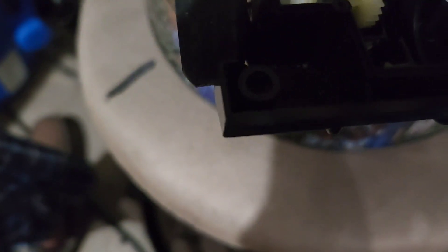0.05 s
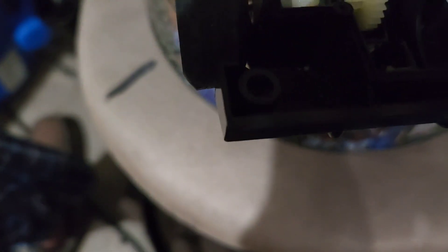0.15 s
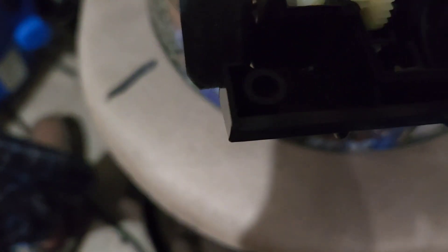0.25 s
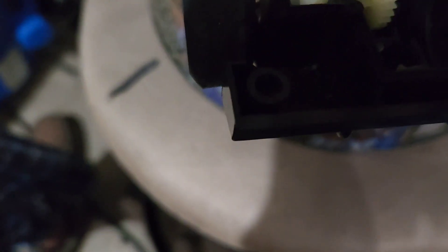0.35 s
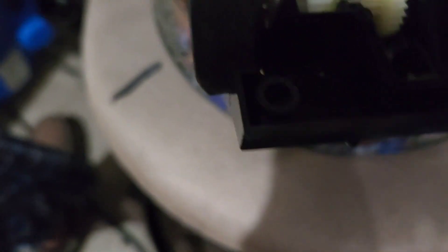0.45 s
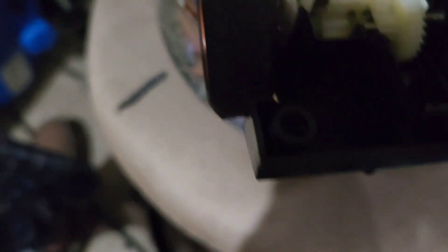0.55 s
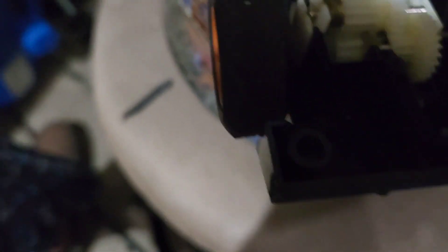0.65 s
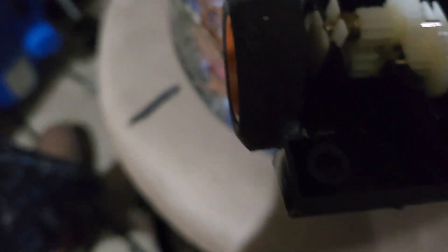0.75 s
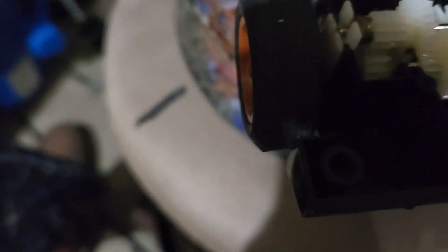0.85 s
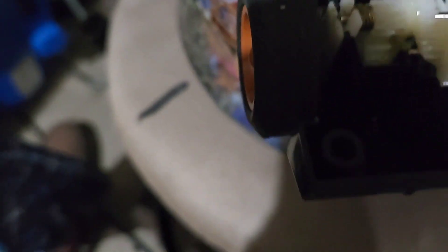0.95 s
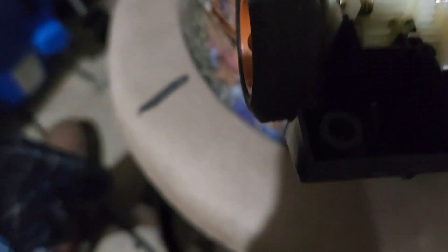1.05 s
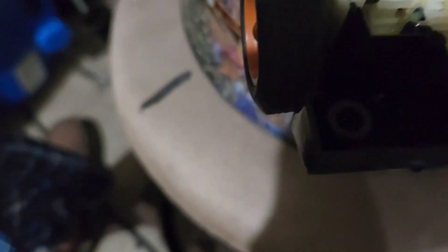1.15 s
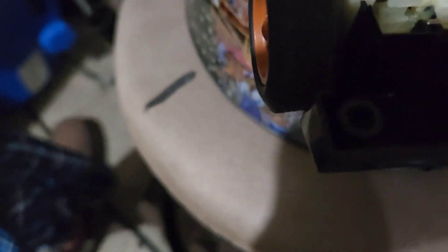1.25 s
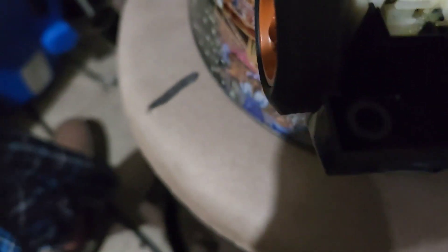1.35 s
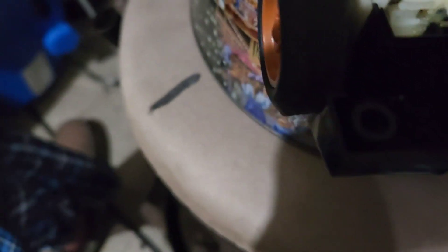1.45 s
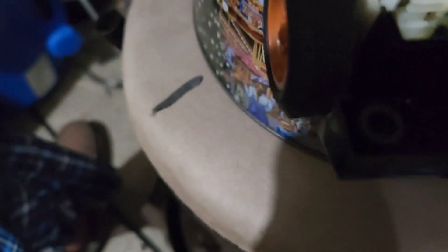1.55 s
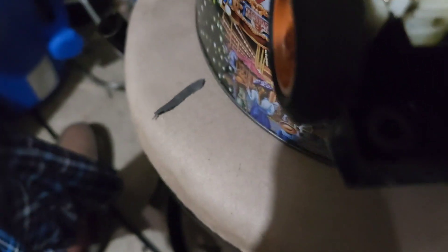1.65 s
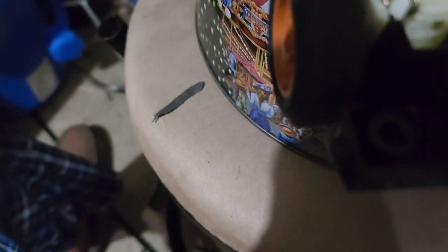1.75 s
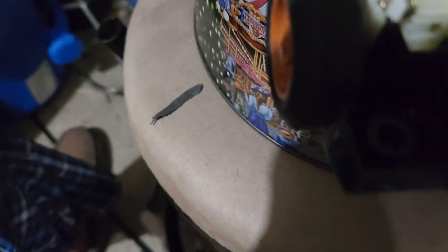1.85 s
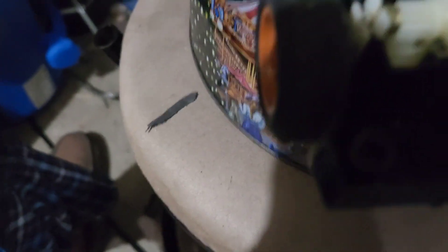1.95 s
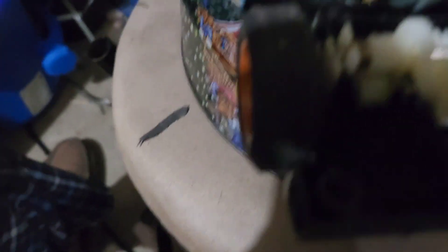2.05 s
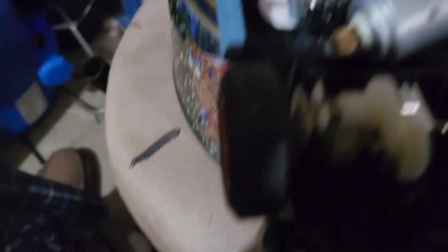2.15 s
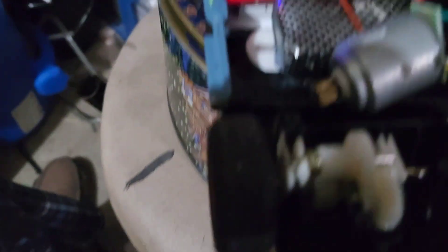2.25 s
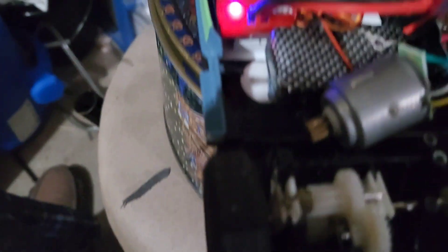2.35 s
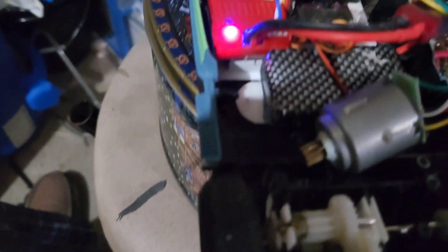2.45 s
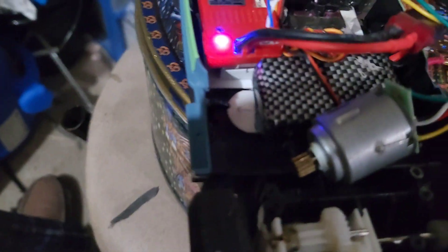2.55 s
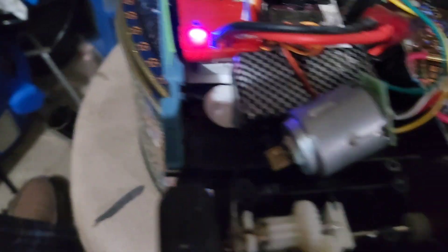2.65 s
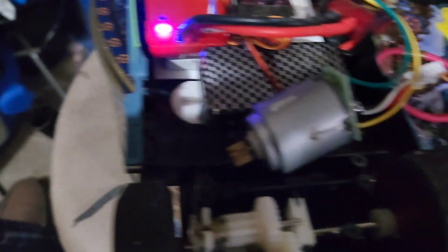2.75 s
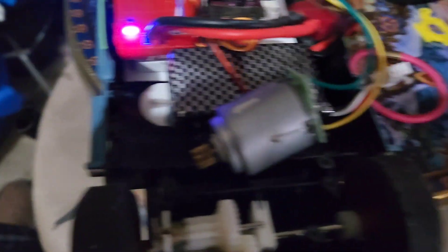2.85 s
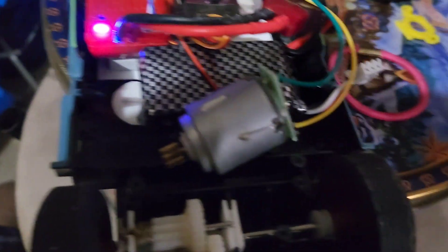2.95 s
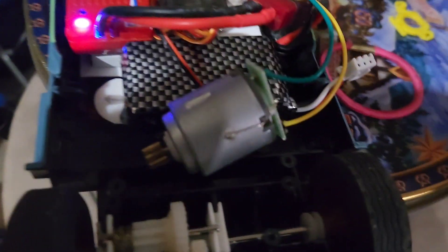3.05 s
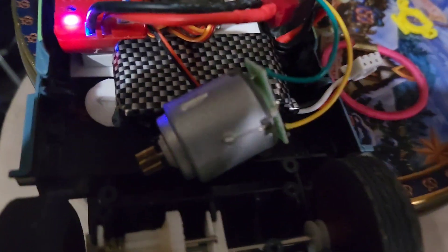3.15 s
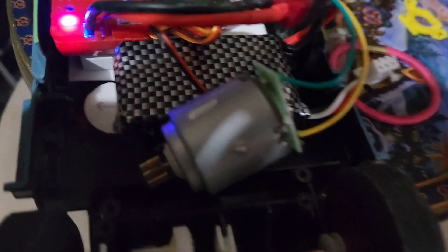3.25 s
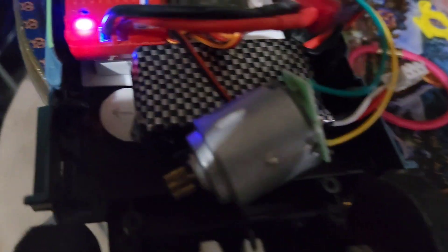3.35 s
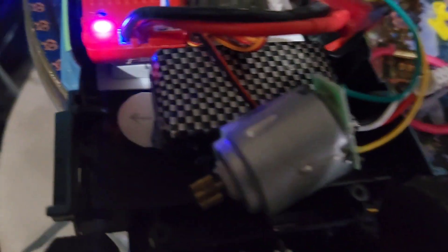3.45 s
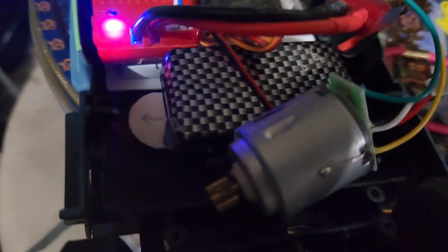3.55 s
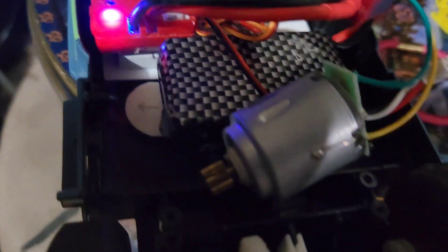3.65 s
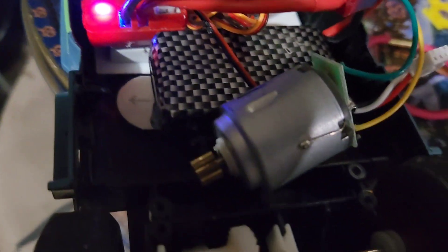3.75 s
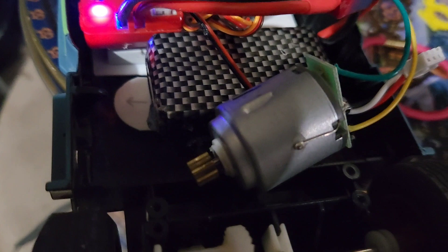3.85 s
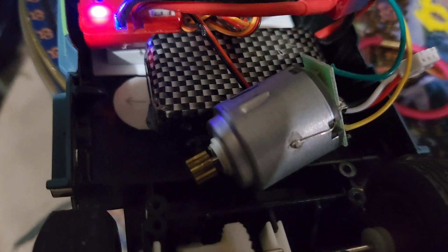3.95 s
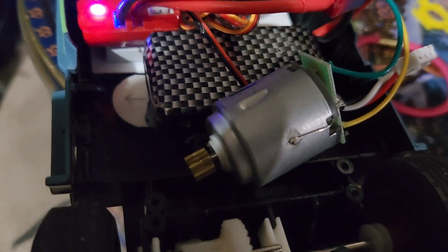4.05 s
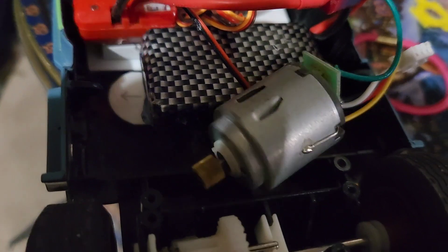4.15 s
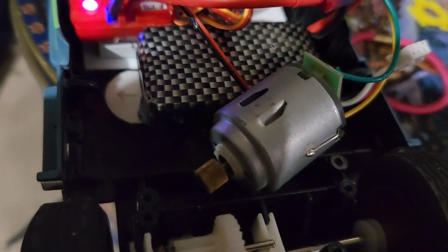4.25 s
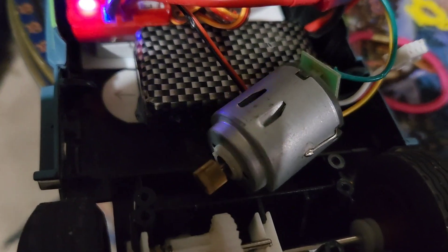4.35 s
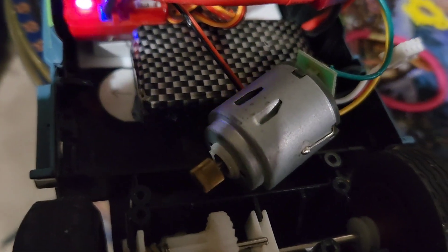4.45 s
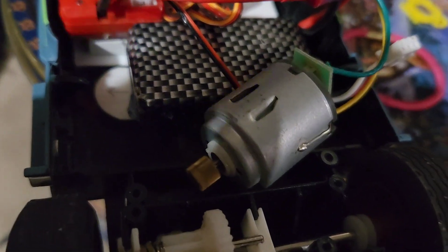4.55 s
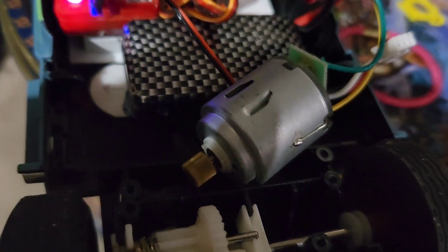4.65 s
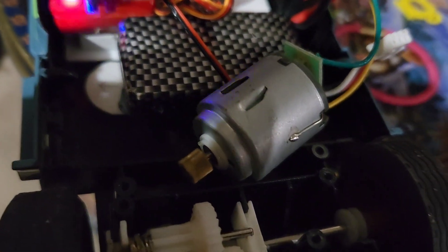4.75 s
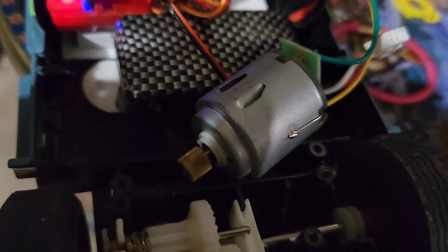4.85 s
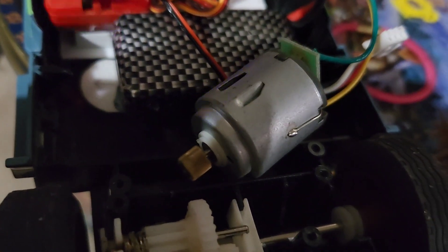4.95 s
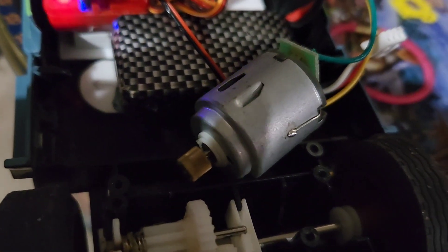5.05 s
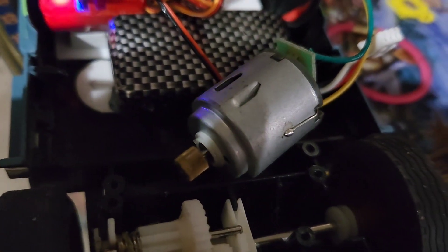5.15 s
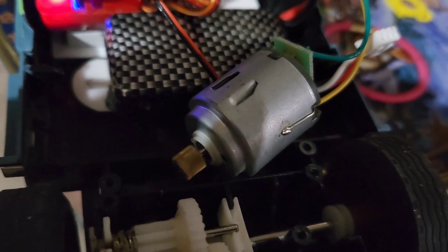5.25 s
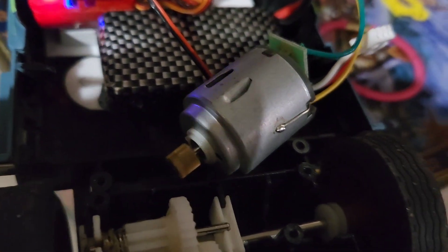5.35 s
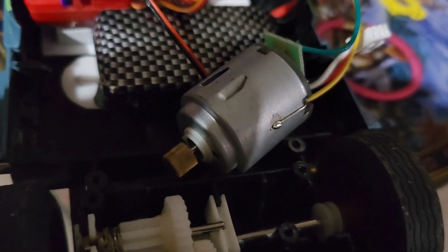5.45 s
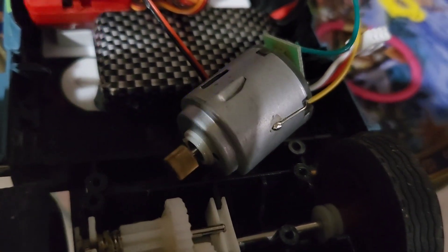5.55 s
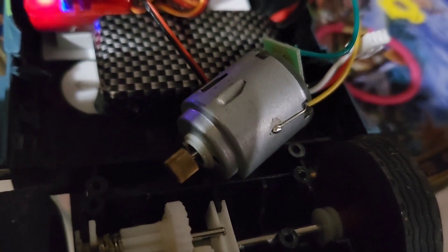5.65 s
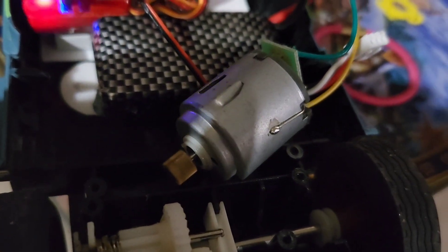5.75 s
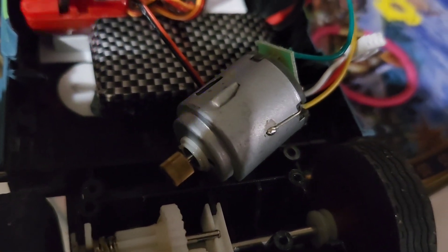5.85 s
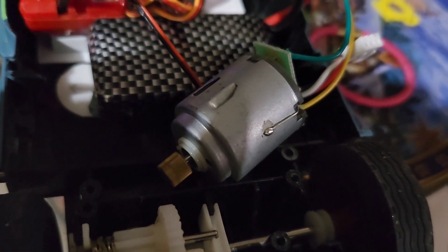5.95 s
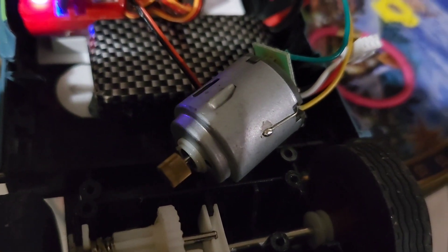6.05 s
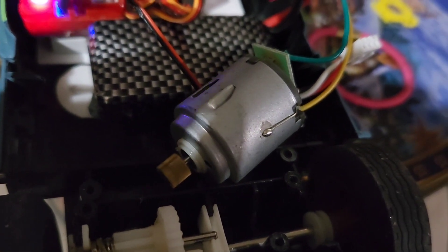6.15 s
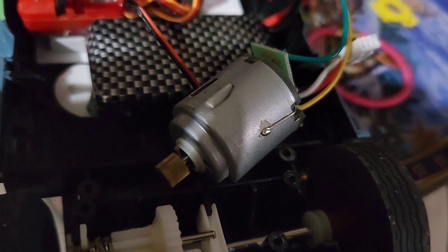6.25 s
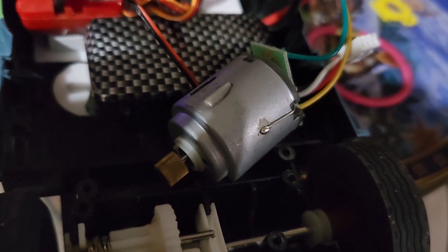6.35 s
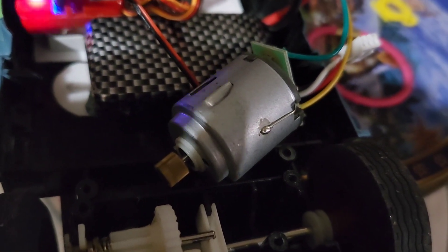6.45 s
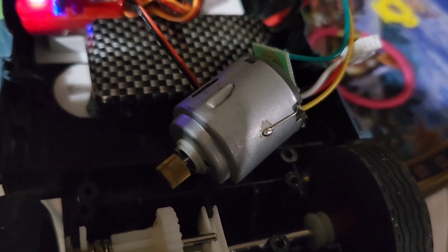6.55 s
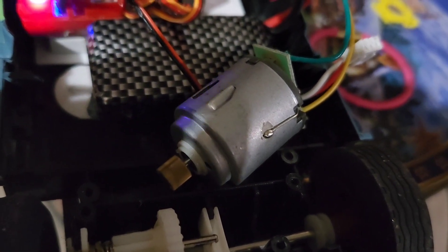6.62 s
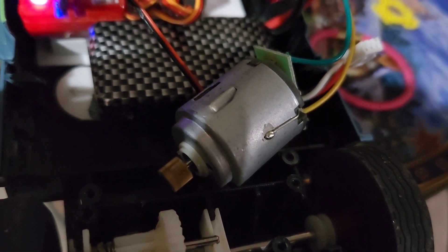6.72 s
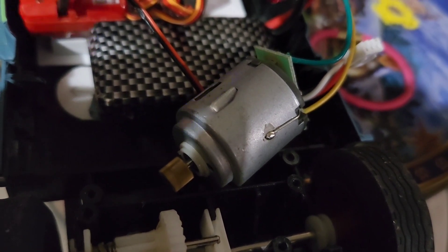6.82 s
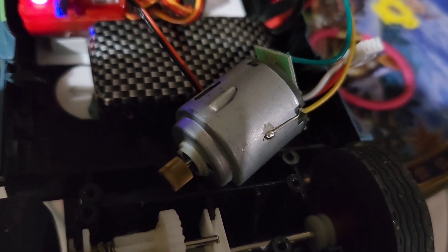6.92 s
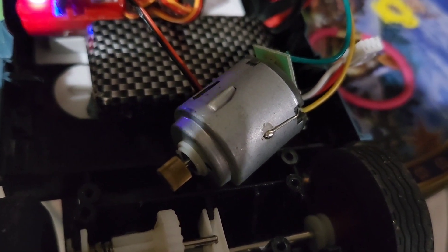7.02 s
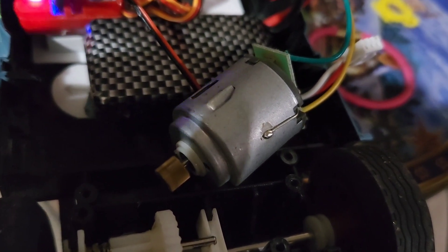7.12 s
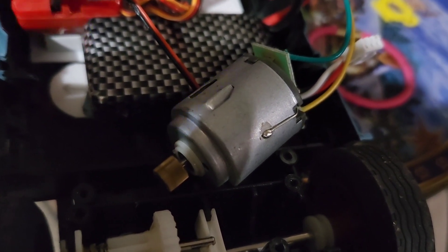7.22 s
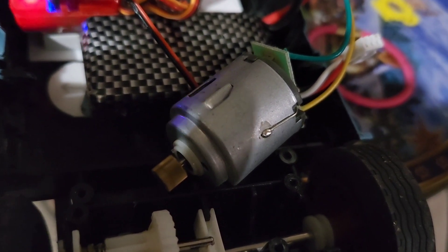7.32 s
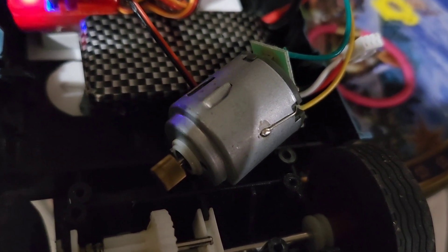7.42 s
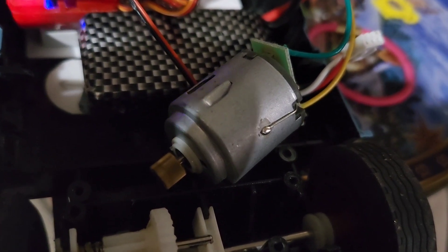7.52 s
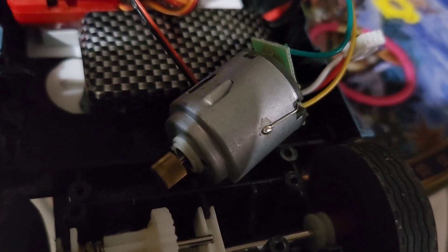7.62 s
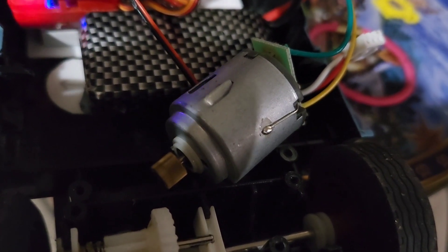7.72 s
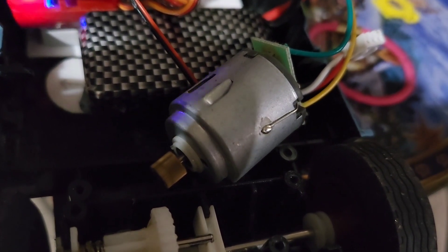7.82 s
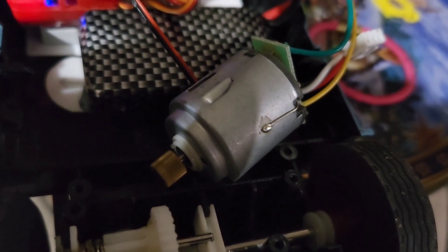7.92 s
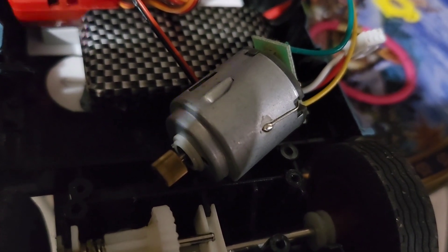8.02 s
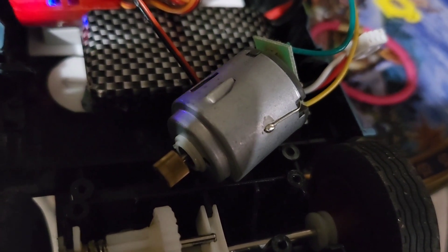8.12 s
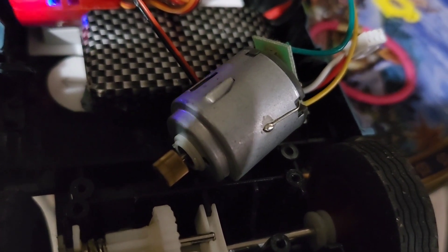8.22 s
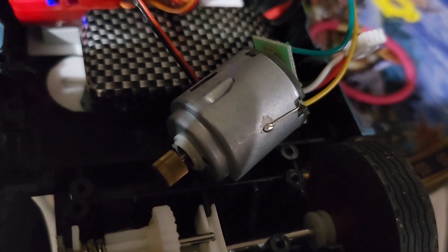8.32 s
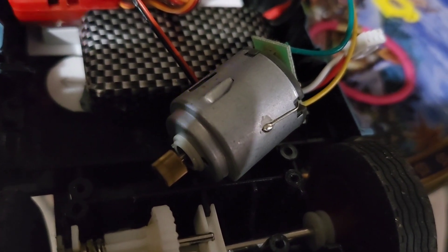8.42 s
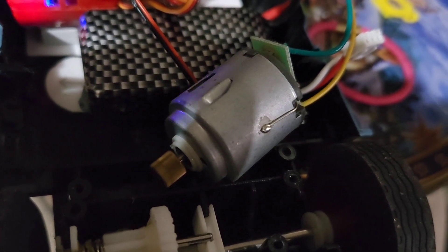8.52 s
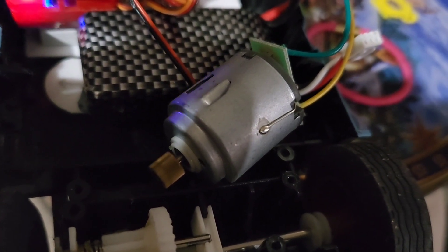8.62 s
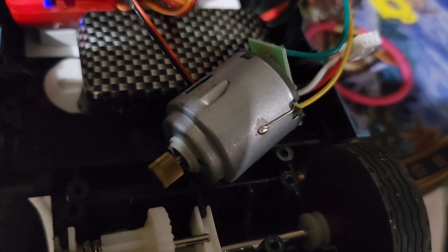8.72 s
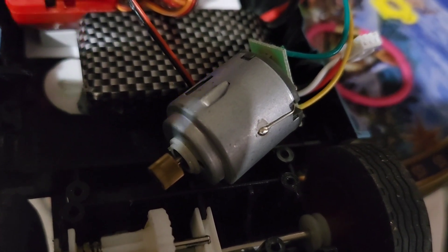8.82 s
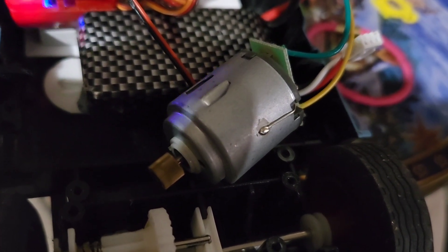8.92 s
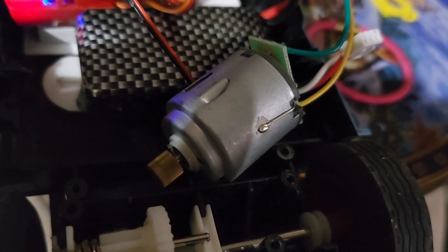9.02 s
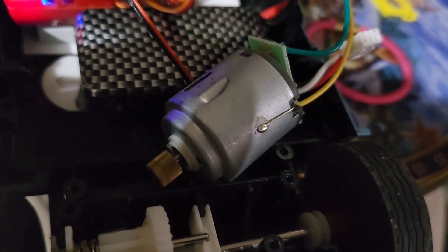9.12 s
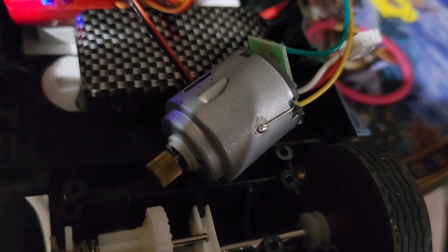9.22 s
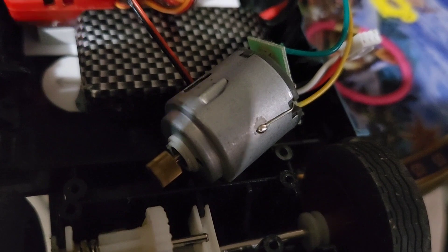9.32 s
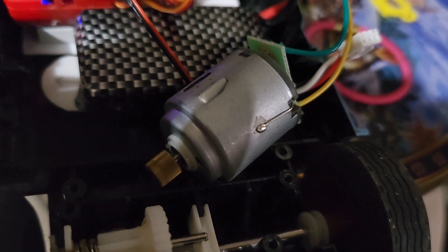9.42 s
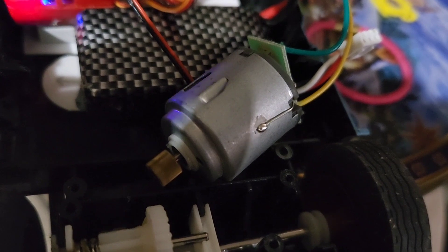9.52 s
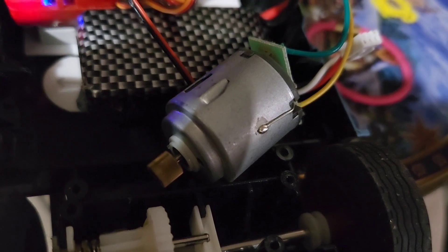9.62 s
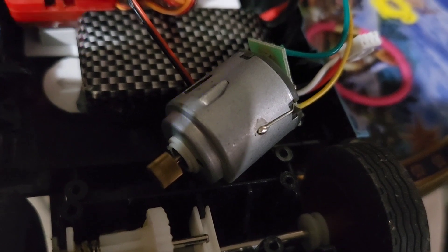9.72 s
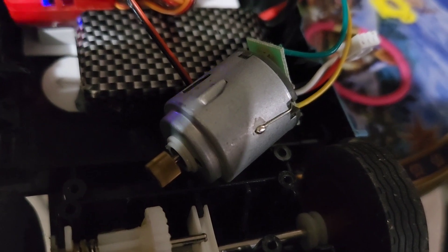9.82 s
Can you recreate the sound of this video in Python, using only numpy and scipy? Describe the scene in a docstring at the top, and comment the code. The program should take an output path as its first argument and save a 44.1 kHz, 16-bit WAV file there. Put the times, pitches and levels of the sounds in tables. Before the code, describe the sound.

In a quiet room with a low hum, hands turn a plastic toy car close to the microphone, making rustles, sharp clicks and a few soft knocks. A distant bird chirps faintly. About four seconds in, a tiny buzz starts a small electric motor lying loose on the chassis. It chatters as its pitch climbs, then settles into a steady, raspy whine, close and to the left.

```python
"""Toy motor spinning up

In a quiet room with a hum and a far bird, hands shift a plastic toy: rustle, clicks, soft knocks.
A speed controller buzzes, then a small brushed motor lying loose on the chassis starts, close on the left.
Its brush scrape and shaft tones ring the can and chassis; it chatters as it climbs, then whines steadily."""
import sys
import numpy as np
from scipy import signal
from scipy.fft import rfft, irfft, next_fast_len
from scipy.io import wavfile
from scipy.ndimage import uniform_filter1d

SR = 44100
rng = np.random.default_rng(int(sys.argv[2]) if len(sys.argv) > 2 else 0)


def unload_wav(signal):
    """Save mono or channel-first audio to the path in sys.argv[1] as 16-bit WAV at rate SR, clipped to [-1, 1]."""
    wavfile.write(
        sys.argv[1],
        SR,
        np.round(np.clip(np.atleast_2d(signal).T, -1, 1) * 32767).astype(np.int16),
    )


N = 435708
TIME = np.arange(N) / SR
FFT_SIZE = next_fast_len(N, True)
HZ = np.fft.rfftfreq(FFT_SIZE, 1 / SR)


def gain_of(db):
    """Decibels to amplitude."""
    return 10 ** (np.asarray(db) / 20)


def curve(points):
    """Joins spectrum points on a log-frequency axis."""
    f, *columns = np.transpose(points)
    return np.squeeze([np.interp(np.log(HZ + 1), np.log(f + 1), c) for c in columns])


def follow(rows):
    """A soft gate for the span of a (time, value) table, and its value at every sample."""
    times, values = np.transpose(rows)
    gate = uniform_filter1d(1. * ((TIME > times[0]) & (TIME < times[-1])), size=300)
    return gate, np.interp(TIME, times, values)


def humps(modes, hz=HZ):
    """Summed resonance peaks in dB."""
    return sum(db / (1 + (2 * (hz - f) / width) ** 2) for f, width, db in modes)


def band(lo_hz, hi_hz):
    """Smooth band-pass gain."""
    return 1 / np.sqrt((1 + (lo_hz / (HZ + 1)) ** 6) * (1 + (HZ / hi_hz) ** 6))


def coloured(gain, channels=2):
    """Noise of rms 1 with the given spectrum."""
    white = rng.standard_normal((channels, len(HZ), 2)) @ [1, 1j]
    noise = irfft(white * gain, FFT_SIZE)[:, :N]
    return noise / np.sqrt(np.mean(noise ** 2) + 1e-20)


def wobble(lo_hz, hi_hz):
    """Random modulation of rms 1 between two rates."""
    return coloured(band(lo_hz, hi_hz), channels=1)[0]


def panned(db):
    """Left and right gains; positive leans left."""
    return gain_of([[db / 2], [-db / 2]])


def add(mix, start_s, sound):
    """Mixes a sound in at its start time."""
    part = mix[:, round(start_s * SR):][:, :sound.shape[1]]
    part += sound[:, :part.shape[1]]


# room tone EQ: f/Hz, relative level/dB
ROOM_EQ = [(12, -28), (24, -17.5), (38, -2.5), (53, -4), (85, -17.5), (130, -8), (162, -20.5), (196, -28),
           (222, -29), (246, -18), (268, -32.5), (310, -31.5), (344, -43), (4120, -48), (10000, -67.5),
           (10900, -54.5), (15700, -74)]
# stereo image of the room: f/Hz, left-right likeness
ROOM_LIKENESS = [(60, 0.95), (180, 0.76), (550, -0.5), (1650, 0.2), (4970, -1.4), (15000, -0.2)]


def room_tone():
    """Low rumble, nearly mono, under a faint wide hiss."""
    left, other = coloured(gain_of(curve(ROOM_EQ)))
    same = np.clip(curve(ROOM_LIKENESS), 0, 1)
    right = same * rfft(left, FFT_SIZE) + np.sqrt(1 - same ** 2) * rfft(other, FFT_SIZE)
    return gain_of(-55) * panned(2.6) * [left, irfft(right, FFT_SIZE)[:N]]


# hum lines: f/Hz, level/dB
HUM_LINES = [(120, -74.5), (239, -69)]
# fader of the electronic whine: t/s, level/dB
WHINE_FADER = [(0, -96), (.9, -102), (1.2, -84), (2.2, -81.5), (3, -87), (4.3, -83.5)]


def hum(whine_hz=10541):
    """A low hum and a thin electronic whine, wavering together in level."""
    _, whine_db = follow(WHINE_FADER)
    lines = sum(gain_of(db) * np.sin(2 * np.pi * hz * TIME) for hz, db in HUM_LINES)
    whine = gain_of(whine_db) * np.sin(2 * np.pi * whine_hz * TIME)
    return np.sqrt(2) * (lines + whine) * gain_of(2 * wobble(2, 17))


# bird calls: t/s, length/s, from f/Hz, to f/Hz, level/dB
BIRD_CHIRPS = [(2.266, 0.18, 5100, 3950, -66.5), (2.301, 0.18, 3900, 3420, -64.5),
               (2.93, 0.11, 4710, 3360, -66), (3.31, 0.12, 4530, 4820, -67),
               (3.373, 0.079, 3830, 3380, -62), (3.657, 0.097, 4310, 3960, -58),
               (3.727, 0.071, 3900, 3510, -66)]


def bird(reverb_t60=0.2):
    """Raspy whistles, mostly falling, smeared by distance."""
    calls = np.zeros((1, N))
    for start, length, from_hz, to_hz, db in BIRD_CHIRPS:
        t = np.arange(0, length, 1 / SR)
        trill = 1 + 0.036 * np.sin(2 * np.pi * 30 * t)
        hz = np.interp(t, [0, length], [from_hz, to_hz]) * trill
        whistle = np.sin(2 * np.pi * np.cumsum(hz) / SR) * signal.windows.tukey(len(t), .8)
        add(calls, start, gain_of(db) * whistle[None])
    calls *= 0.8 + 1.13 * wobble(18, 280)  # rasp
    tail = rng.standard_normal((2, 15000)) * gain_of(-60 * np.arange(15000) / SR / reverb_t60)
    return 0.49 * calls + signal.oaconvolve(calls, tail / np.linalg.norm(tail[0]), axes=1)[:, :N]


# EQ of skin on plastic: f/Hz, relative level/dB
RUB_EQ = [(600, 5.5), (900, 3), (2230, 0.5), (2900, -1), (3400, -0.5), (4400, -1), (5800, -13.5),
          (7500, -12.5), (10000, -23), (12500, -15.5), (15700, -15.5)]
# resonances of the rubbed plastic: f/Hz, width/Hz, boost/dB
RUB_MODES = [(652, 71, 8.5), (806, 70, 2.5), (1190, 120, 9.5), (2160, 150, 5), (3490, 200, 0),
             (4140, 190, 7.5), (7630, 395, 5), (11800, 700, 2), (15060, 900, 2.5)]
# hollow ring in the rumble: f/Hz, width/Hz, boost/dB
HOLLOW_MODE = [(361, 19, 13.5)]
# finger strokes: start t/s, top t/s, end t/s, scrape/dB, hiss/dB, treble/dB, rumble/dB, pan/dB
FINGER_STROKES = [(-.05, .0, 0.1, -68, -78, -81, -72, 9), (0.11, 0.151, 0.26, -63, -61, -57, -46.5, 6),
                  (0.236, 0.284, 0.3, -69, -60, -76, -59.5, 7.5),
                  (0.267, 0.38, 0.43, -64, -55, -58.5, -46.5, 5.5),
                  (0.36, 0.397, 0.48, -47, -71, -66.5, -45, 6.5),
                  (0.437, 0.513, 0.45, -76.5, -72, -73, -59.5, 6),
                  (0.668, 0.773, 0.95, -84, -77, -75, -86.5, 8.5),
                  (0.935, .95, 1.6, -90, -80.5, -62, -92, 1),
                  (1.154, 1.175, 1.25, -54, -63, -60.5, -65, 13),
                  (1.236, 1.287, 1.45, -63, -51.5, -55, -66, 5.5),
                  (1.31, 1.321, 1.45, -44.5, -58, -69, -43, 5.5),
                  (1.48, 1.598, 1.68, -76.5, -69, -65, -60, 4.5),
                  (1.595, 1.654, 1.78, -76, -52.5, -55.5, -60, 3),
                  (1.666, 1.74, 1.87, -61, -55, -57, -75, 5),
                  (1.729, 1.738, 1.867, -39.5, -62, -74, -40, 7.5),
                  (1.866, 1.917, 1.996, -44, -44.5, -61, -43, 3),
                  (3.008, 3.066, 3.27, -78, -72, -77, -73, 10), (3.1, 3.145, 3.64, -69, -81, -85, -72, 9),
                  (3.33, 3.4, 3.49, -59, -63, -70, -62, 11), (3.397, 3.453, 3.77, -70.5, -78, -89, -68, 8),
                  (3.655, 3.694, 3.78, -59, -69, -88, -79, 9),
                  (3.727, 3.761, 3.82, -60, -76, -94, -60.5, 10)]
# bed of hands holding the toy: start t/s, end t/s, scrape/dB, hiss/dB, treble/dB, rumble/dB, pan/dB
HOLDS = [(0, .6, -85, -82.5, -79, -81, 8), (0.903, 2.038, -83, -86, -80.5, -85, 8),
         (2.95, 3.547, -92, -96, -93, -83, 4)]


def rustle():
    """Fingers rub the plastic: three bands of grainy noise over a hollow rumble."""
    rub = gain_of(curve(RUB_EQ) + humps(RUB_MODES))
    grain = gain_of(1.5 * wobble(14, 300))
    scrape = grain * coloured(rub * band(449, 1900))
    hiss = grain * coloured(rub * band(1700, 5100))
    treble = grain * coloured(rub * band(6000, 16000))
    rumble = coloured(band(120, 430) ** 3 * gain_of(humps(HOLLOW_MODE)), channels=1)
    envelopes = []
    for start, top, end, *_ in FINGER_STROKES:
        dip = np.interp(TIME, [start - .03, start, top, end, end + .037], [4.4, 1.3, .11, 1.6, 2.15])
        envelopes.append(gain_of(-21.5 * dip ** 1.33))  # the power rounds the top
    envelopes += [uniform_filter1d(1. * (TIME > start) * (TIME < end), 2000) for start, end, *_ in HOLDS]
    out = np.zeros((2, N))
    for envelope, row in zip(envelopes, FINGER_STROKES + HOLDS):
        *bands_db, rumble_db, pan_db = row[-5:]
        span = slice(*np.flatnonzero(envelope > envelope.min() + 1e-9)[[0, -1]])
        rubbed = sum(gain_of(db) * noise[:, span] for db, noise in zip(bands_db, (scrape, hiss, treble)))
        out[:, span] += envelope[span] * (panned(pan_db) * rubbed + gain_of(rumble_db) * rumble[:, span])
    return out


HIT_SIZE = 8192
HIT_TIME = np.arange(HIT_SIZE) / SR


def decay(t60):
    """Envelope of a hit, falling 60 dB in t60 seconds."""
    return gain_of(-60 * HIT_TIME / t60)


def ring(hz, t60):
    """One dying mode with a soft attack."""
    return np.sin(2 * np.pi * hz * HIT_TIME) * decay(t60) * (1 - np.exp(-HIT_TIME / 0.0015))


# soft knocks on the toy: t/s, level/dB, f/Hz
KNOCK_CUES = [(2.65, -42, 360), (2.698, -45, 314), (2.745, -41, 322), (2.786, -47, 305), (2.824, -45, 374),
              (2.913, -44, 317), (2.961, -47, 315), (3.062, -43, 273), (3.249, -45, 280), (3.512, -49, 300),
              (3.545, -47, 261)]


def knocks():
    """Each bump rings one low, well-damped mode of the toy."""
    out = np.zeros((2, N))
    for start, db, hz in KNOCK_CUES:
        add(out, start, gain_of(db) * ring(hz, t60=0.035) * panned(9))
    return out


# resonances of the plastic shell: f/Hz, width/Hz, boost/dB
SHELL_MODES = [(786, 290, 7), (1216, 1500, 10.5), (1560, 99, 2), (1870, 160, 0.5), (2300, 280, 12),
               (3350, 250, 8), (4570, 3100, 11.5), (4310, 150, 9.5), (5200, 200, -6), (7040, 200, 12),
               (7600, 200, 15), (9700, 600, -12), (12870, 2000, 9)]
# low modes in each thump: f/Hz, relative level/dB, t60/s
THUMP_MODES = [(104.4, -2.5, 0.13), (160.8, -11.5, 0.52), (180, 0.5, 0.14), (198.7, -8.5, 0.65),
               (268, 4.5, 0.12), (361, -7, 0.12)]
# clicks: t/s, level/dB, brightest f/Hz, roll-off/(dB per octave), snap send/dB, thump send/dB, pan/dB
CLICK_CUES = [(0.02, -46.5, 3580, 29, 0, -7, 0), (0.182, -54, 3000, 13, -11, 9, 8),
              (0.271, -43.5, 4240, 11, -36, -11, 1), (0.406, -32, 3830, 7.5, -30, -6.5, 3),
              (0.484, -48, 3590, 6, -14, -2, 5.5), (0.501, -37, 3420, 10, 2, -15, -1),
              (0.507, -36, 3640, 10, 4, -19, 7), (0.516, -34, 3450, 12, -1, -28, -2),
              (0.524, -37, 3520, 6, -28, -26, 12), (0.75, -49, 4260, 20, -34, -22, 2),
              (0.815, -52, 4210, 14, -23, -14, 3), (0.842, -62, 3750, 13, -22, 8.5, 8),
              (0.9663, -31, 4560, 11.5, 1, -56.5, -0.5), (0.971, -29, 4780, 8.5, -4, -37.5, 7.5),
              (1.038, -20.5, 4780, 10.5, 7, -33.5, 4), (1.165, -33, 2480, 4, 1, -9.5, 0),
              (1.273, -43, 4510, 3, -5, -19, -1), (1.304, -36, 4300, 8, -22, -31, -8),
              (1.322, -24.5, 1555, 3, -28, -7.5, 2), (1.389, -39, 2460, 14, -37, -12, 4),
              (1.541, -48, 4530, 15, -22, -5, -4), (1.649, -45, 4250, 16, -17, -10, -11),
              (1.7367, -19.5, 1400, 8, -35, -5.5, 2), (1.755, -30.5, 1730, 7, -31, -8.5, 6),
              (1.884, -41, 2180, 6, -9, -19, 4), (1.91, -37, 2170, 15, 1, 7, 1.5),
              (1.923, -38.5, 1480, 8, -34, -2, 10), (2.225, -53, 2600, 8, -14.5, -20, 3),
              (2.649, -58.5, 990, 6, -26, 1, 9), (2.912, -64, 937, 9, -19, -9, 11),
              (3.164, -34, 1224, 17, -43, -8, 6), (3.281, -42.5, 1206, 23, -39, -2.5, 11),
              (3.453, -39.5, 1170, 25, -41, -7, 8)]


def clicks(ping_cycles=70):
    """Noise bursts through the modes of the plastic, each with a ping, a thin snap and a thump."""
    out, hz = np.zeros((2, N)), np.fft.rfftfreq(HIT_SIZE, 1 / SR)
    noises = rfft(rng.standard_normal((len(CLICK_CUES), 2, HIT_SIZE)))
    shell = gain_of(humps(SHELL_MODES, hz)) / (1 + (500 / (hz + 1)) ** 4)
    thump = sum(gain_of(db) * ring(f, t60) for f, db, t60 in THUMP_MODES)
    thump /= abs(thump).max()
    attack = (1 - np.exp(-HIT_TIME / .0012)) ** 2
    envelope = attack * (gain_of(13) * decay(.01) + decay(.051) + gain_of(-15) * decay(.23))
    for (start, db, bright_hz, slope_db, snap_db, thump_db, pan_db), noise in zip(CLICK_CUES, noises):
        spectrum = (noise + 0.13 * noise[::-1]) * shell  # slight left-right bleed
        focus_db = humps([(bright_hz, 300, 2.5)], hz) - slope_db * abs(np.log2((hz + 50) / bright_hz))
        body = irfft(spectrum * gain_of(focus_db)) * envelope
        snap = irfft(spectrum / (1 + (8000 / (hz + 1)) ** 8)) * envelope * (0.071 + decay(.0078))
        ping = gain_of(-9.5) * ring(bright_hz, ping_cycles / bright_hz)
        click = body / abs(body).max() + ping + gain_of(snap_db) * snap / abs(snap).max()
        add(out, start, gain_of(db) * (click * panned(pan_db) + gain_of(thump_db) * thump))
    return out


# fader of the controller buzz: t/s, level/dB
BUZZ_FADER = [(4.225, -65.5), (4.25, -70), (4.29, -75), (4.345, -76)]
# harmonics of the chopping rate, from the first: relative level/dB
BUZZ_HARMONICS = [0, -4, 2, 0, -12, 3, 1, -5, -5, -15, -16, -20, -20, -17, -9]


def controller(chop_hz=978):
    """Chopped current buzzes briefly in the windings as the motor starts."""
    gate, level_db = follow(BUZZ_FADER)
    cycles = np.cumsum(chop_hz * (1 + 0.0051 * wobble(12, 220))) / SR
    buzz = sum(gain_of(db) * np.cos(2 * np.pi * (k * cycles + rng.random()))
               for k, db in enumerate(BUZZ_HARMONICS, 1))
    return gate * gain_of(level_db) * buzz * panned(12)


# bouts of the loose can chattering on the chassis: start t/s, end t/s, boost/dB
CHATTER_BOUTS = [(4.275, 4.738, 9), (4.736, 5.148, 4), (5.154, 5.497, 4), (5.496, 5.762, 6),
                 (5.82, 5.905, 5)]
SETTLED_S = np.maximum(TIME - CHATTER_BOUTS[-1][1], 0)  # time since the last bout


def chatter(edge_s=.025, flutter_db=1.04):
    """Extra level in dB while the can bounces, with an uneven flutter."""
    boost_db = sum(db * (TIME > start) * (TIME < end) for start, end, db in CHATTER_BOUTS)
    boost_db = uniform_filter1d(boost_db, int(edge_s * SR) + 1)
    return boost_db + flutter_db * np.minimum(abs(boost_db), 1) * wobble(1.3, 14)


def brushes(turns, speed):
    """Brush scrape: a steady rub, a tick at each of three commutator gaps, and stray sparks."""
    ticks = np.diff(np.floor(3 * turns), prepend=0) * gain_of(2 * rng.standard_normal(N))
    sparking = rng.random(N) < 6 * speed / SR
    sparks = sparking * gain_of(1.3 * np.minimum(rng.exponential(1, N), 4) - 10)
    bursts = signal.lfilter([1], [1, -np.exp(-1 / (0.0018 * SR))], ticks + sparks)
    bursts /= uniform_filter1d(bursts + 1e-9, size=4000)
    rub = .09 + 2.6 * (speed / 310) ** 1.5  # fills in between the ticks as speed rises
    once_a_turn = 1 + 0.19 * np.cos(2 * np.pi * turns)
    envelope = (rub + 0.23 * bursts) * once_a_turn * gain_of(0.49 * wobble(1.4, 36))
    return rng.standard_normal((2, N)) * envelope / np.sqrt(uniform_filter1d(envelope ** 2, size=8000))


FULL_SPEED = 309  # turns/s
# swells at critical speeds, for unbalance, three poles, harmonic 9, harmonic 21 and the rest:
# base level/dB, [(speed/(turns/s), width/(turns/s), boost/dB)]
CRITICAL_SPEEDS = [(-24, [(235, 150, 24), (312, 14, 9)]), (-8, [(140, 90, 2), (312, 40, 8)]),
                   (-3, [(40, 70, -14), (160, 30, -4), (195, 40, 8), (255, 60, 11), (290, 14, 4)]),
                   (-16, [(197, 26, 19), (312, 14, 16)]), (-13, [(312, 36, 13)])]
# chassis resonances that the low harmonics sweep through: f/Hz, width/Hz, boost/dB
SWEPT_MODES = [(195, 30, 4), (260, 30, 11), (384, 50, 11), (520, 50, 12), (870, 52, 9), (1113, 77, 5)]


def run_up(speed, count):
    """Gain by harmonic number, 1 at full speed: tones swell as they climb through resonances."""
    climb = np.minimum(np.append(speed, FULL_SPEED), FULL_SPEED)
    curves = [base_db + humps(swells, climb) for base_db, swells in CRITICAL_SPEEDS]
    unbalance, poles, ninth, squeal, rest = [gain_of(db[:-1] - db[-1]) for db in curves]
    gains = {k: rest ** (1 if k < 10 else 2.8 if k <= 30 else 1.5) for k in range(1, count + 1)}
    gains.update({1: unbalance, 3: poles, 4: rest ** .55, 21: squeal})
    gains[9] = np.array([ninth, ninth ** .35])  # swells less on the right
    for k in range(2, 11):
        swept_db = humps(SWEPT_MODES, k * climb)
        gains[k] = gains[k] * gain_of(swept_db[:-1] - swept_db[-1])
    return gains


# shaft harmonics from the first, against 1 Hz of brush noise: left level/dB, right level/dB
SHAFT_HARMONICS = [(30, 32), (22, 25), (32, 33), (26, 16), (24, 20), (30, 27), (12, 12), (18, 10), (27, 33),
                   (13, 6), (13, 19), (26, 13), (29, 28), (23, 17), (23, 21), (20, 20), (24, 23), (20, 10),
                   (16, 21), (22, 27), (23, 30), (18, 30), (20, 23), (28, 26), (22, 30), (26, 28), (27, 21),
                   (24, 17), (23, 28), (31, 33), (20, 25), (25, 25), (28, 21), (28, 25), (8, 5), (29, 23),
                   (7, 21), (21, 23), (20, 19), (16, 23), (27, 22), (23, 23), (20, 18), (26, 28), (24, 17),
                   (23, 20), (23, 22), (17, 25), (18, 10), (21, 19)]
# how far the right side trails the left, per harmonic: lag/rad
SHAFT_PHASES = [0.1, 0.3, 1.5, 2.3, -2.7, 2.6, 3.0, 2.7, 3.0, -2.9, -2.1, 2.7, -0.4, -1.4, 0.6, 3.1, -0.9,
                -2.0, 0.8, -1.6, 2.3, 3.0, 0.6, -1.3, 1.8, 1.3, -1.5, -0.1, -1.2, 2.5, -2.9, -1.8, 0.4, 3.1,
                3.0, -1.9, -2.6, -1.8, -1.9, -0.3, -0.8, 2.8, 2.7, -0.6, -1.2, -0.6, -2.7, -2.1, -0.9, -1.5]


def shaft(turns, gate, speed):
    """Tones on the harmonics of the shaft speed, each drifting in level on its own."""
    first = np.argmax(gate > 0)
    spin = np.exp(2j * np.pi * turns[first:])
    gains = run_up(speed[first:], len(SHAFT_HARMONICS))
    lags = dict(enumerate(SHAFT_PHASES, 1))
    # once the can settles, the ninth fades and slips out of step between the sides
    gains[9] *= gain_of(-.8 * SETTLED_S[first:])
    lags[9] += .16 * (SETTLED_S[first:] - 2)
    drifts = rng.standard_normal((len(SHAFT_HARMONICS), 120))
    knots = np.linspace(0, len(spin), 120)
    unsettled_db = np.interp(knots, [0, 1.2 * SR, 1.8 * SR], [1.8, 1.8, 0])
    tones = np.zeros((2, N))
    for k, (sides_db, drift) in enumerate(zip(SHAFT_HARMONICS, drifts), 1):
        depth_db = 0.63 + 0.035 * (k - 1) + unsettled_db  # deepest high up and during the climb
        swell = np.interp(np.arange(len(spin)), knots, gain_of(depth_db * drift))
        tone = np.exp(2j * np.pi * rng.random()) * spin ** k
        stereo = np.real([tone, tone * np.exp(-1j * lags[k])])
        tones[:, first:] += gain_of(sides_db)[:, None] * gains[k] * swell * stereo
    return tones * 2 / np.sqrt(SR) * gain_of(-0.56)


# spin-up of the shaft: t/s, speed/(turns/s)
SHAFT_SPEED = [(4.252, 27.0), (4.3, 43), (4.36, 56.3), (4.43, 66), (4.53, 87), (4.632, 115.4), (4.7, 128),
               (4.826, 143.2), (5.15, 187), (5.204, 200.3), (5.25, 213.5), (5.31, 234), (5.398, 256),
               (5.426, 265), (5.465, 284), (5.51, 293.9), (5.584, 300.4), (5.784, 307.4), (5.95, 307.8),
               (6.02, 309.3), (6.44, 310.5), (7.1, 310.7), (7.6, 310.9), (8, 311.4), (8.5, 311.9),
               (8.9, 311.7), (9.2, 312), (9.88, 312.3)]
# EQ of the can and chassis on each side: f/Hz, level/dB
CAN_EQ_LEFT = [(65, -81.5), (323, -65.5), (420, -74.5), (1130, -63.5), (1561, -66.5), (2336, -62),
               (5706, -77), (7386, -69.5), (8882, -83.5), (9421, -76), (11000, -74), (11900, -72.5),
               (12801, -63), (13500, -69.5), (14158, -76.5), (14800, -65), (15590, -56.5)]
CAN_EQ_RIGHT = [(65, -85.5), (320, -68.5), (420, -77), (1200, -74.5), (1450, -73.5), (2700, -76.5),
                (3400, -77.5), (4300, -73), (5700, -89.5), (6900, -86.5), (7450, -78), (8000, -94),
                (8900, -97), (9150, -93), (9400, -86.5), (10900, -86), (11850, -72), (13900, -76.5),
                (14150, -87), (15000, -73), (15590, -71)]
# chassis resonances on top of that EQ: f/Hz, width/Hz, boost/dB
CHASSIS_MODES = [(10120, 170, 3.9), (14200, 380, 2.5), (73.8, 9.4, 20), (159.4, 15, 8.1), (184.8, 27, 12.8),
                 (250, 23, 2.5), (362, 24, 4.1), (497, 29, 6), (570, 14, 4.8), (1161, 182, 7.8),
                 (3450, 500, 0.77), (1505, 51, 3.5), (1990, 600, 1.9), (2180, 93, 4.5), (2393, 73, 8.1),
                 (3060, 27, 3.8), (4330, 49, 2.9)]
# ringing bands heard during the climb, the upper ones at harmonics of the controller's buzz:
# f/Hz, width/Hz, boost/dB
CLIMB_BANDS = [(466, 83, 4), (795, 130, 3), (1657, 53, 5.5), (2940, 330, 5), (3980, 500, 5), (5950, 57, 8)]
# stereo image of the scrape: f/Hz, left-right likeness, right lag/rad
SCRAPE_IMAGE = [(101, 0.98, -1), (503, 0.78, -0.5), (1150, 0.87, 2.5), (1735, 0, 4), (2350, 1, 1),
                (2460, 0, 9), (5640, 0, 15.5), (8500, 0.7, 3.5), (12250, 0.3, 10.5), (12300, 0.8, 10),
                (14440, 0.5, 5), (15250, 0.76, 11)]
# rattle, fizz, treble hiss and climb bands: drive at full speed/dB, gain per speed doubling/dB,
# chatter share, cut at the start/dB, recovery time/s, growth once settled/(dB/s)
MOTOR_LAYERS = [(40.32, 6, 0.37, 15, 0.025, 0.26), (38.83, 7, 0.85, 11, 0.19, 0.5),
                (47.07, 5.5, 0.55, 20, 0.1, 0.34), (31.8, 1, 0.52, 14, 0.076, -25)]


def motor(jolt=.0024, wander=.0011):
    """Brush scrape and shaft tones shake the can and chassis, whose response colours both."""
    gate, speed = follow(SHAFT_SPEED + [(11, SHAFT_SPEED[-1][1])])  # runs on past the end
    chatter_db = chatter()
    jolts = jolt * np.clip(chatter_db, 0, 1) * wobble(14, 120)
    turns = np.cumsum(speed * gate * (1 + jolts + wander * wobble(2.8, 30))) / SR
    sources = np.vstack([brushes(turns, speed), shaft(turns, gate, speed)]) * gate
    same, lag = curve(SCRAPE_IMAGE)
    can_db = np.array([curve(CAN_EQ_LEFT), curve(CAN_EQ_RIGHT)]) + humps(CHASSIS_MODES)
    can = gain_of(can_db) * band(63, 30000) ** 2
    low, high = band(1, 3300) ** 2, band(9230, 30000) ** 2
    filters = low, 1 - low - high, high, gain_of(humps(CLIMB_BANDS)) - 1
    running_s = np.maximum(TIME - SHAFT_SPEED[0][0], 0)
    spectrum = 0
    for (db, doubling_db, share, cut_db, recovery_s, growth), layer_eq in zip(MOTOR_LAYERS, filters):
        drive_db = db + doubling_db * np.log2(speed / FULL_SPEED) + share * chatter_db
        drive_db += growth * SETTLED_S - cut_db * np.exp(-running_s / recovery_s)
        drive_db += 0.72 * wobble(0.64, 5.4)  # each layer surges a little on its own
        scrape_left, other, tones_left, tones_right = rfft(sources * gain_of(drive_db), FFT_SIZE)
        scrape_right = same * scrape_left * np.exp(-1j * lag) + np.sqrt(1 - same ** 2) * other
        spectrum += can * layer_eq * np.array([scrape_left + tones_left, scrape_right + tones_right])
    return irfft(spectrum, FFT_SIZE)[:, :N]


def scene():
    """The stereo mix of motor, handling and room."""
    return motor() + controller() + rustle() + clicks() + knocks() + bird() + room_tone() + hum()


def record(dry):
    """A steep low-pass trims the very top."""
    low_pass = signal.firwin(1601, 15765, window=("kaiser", 8), fs=SR)
    return signal.oaconvolve(dry, low_pass[None], "same")


dry = scene()
out = record(dry)
unload_wav(out)
```